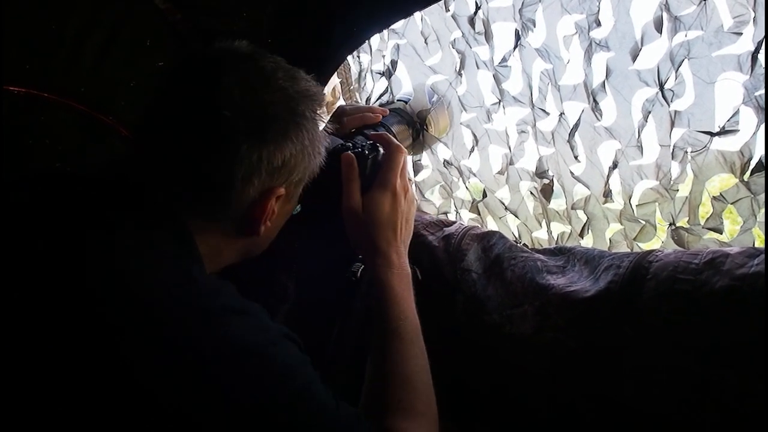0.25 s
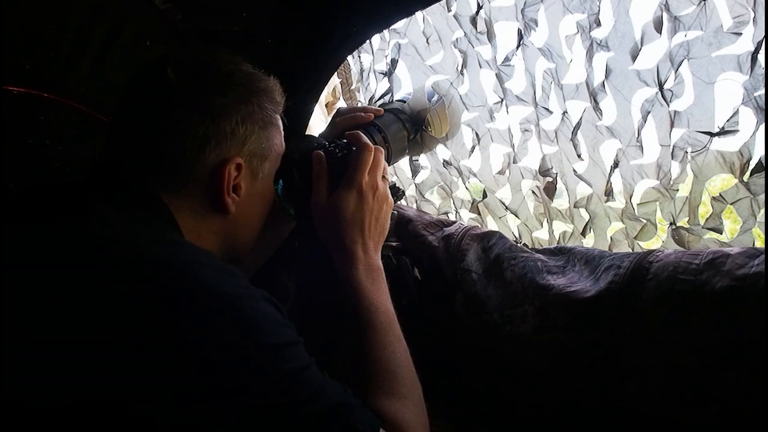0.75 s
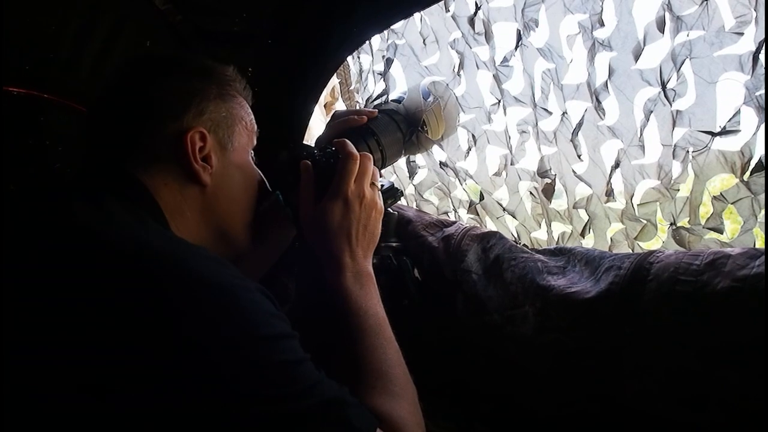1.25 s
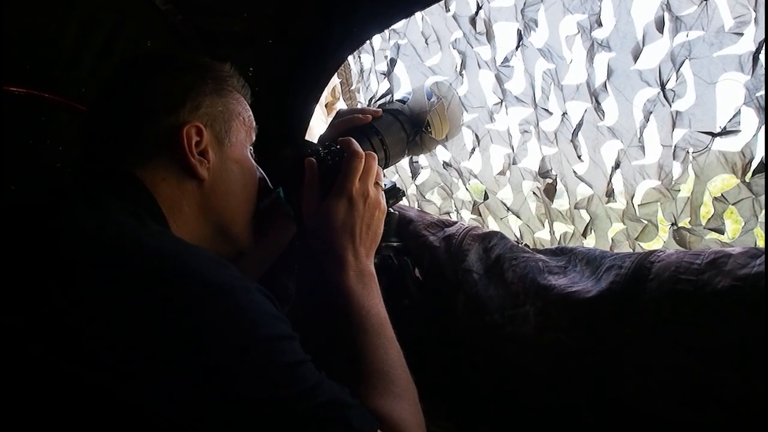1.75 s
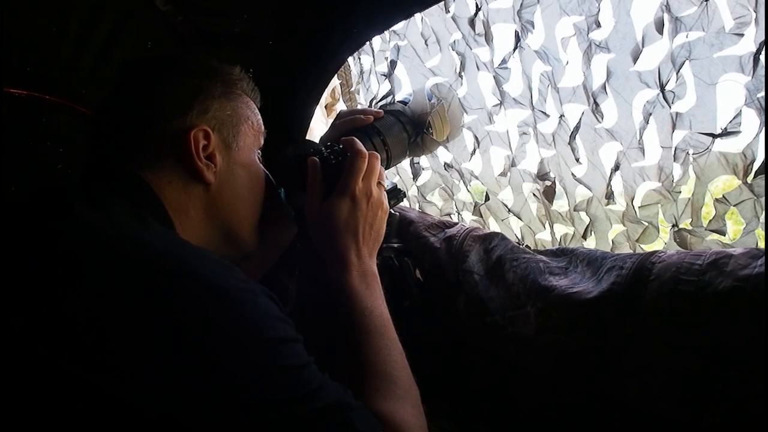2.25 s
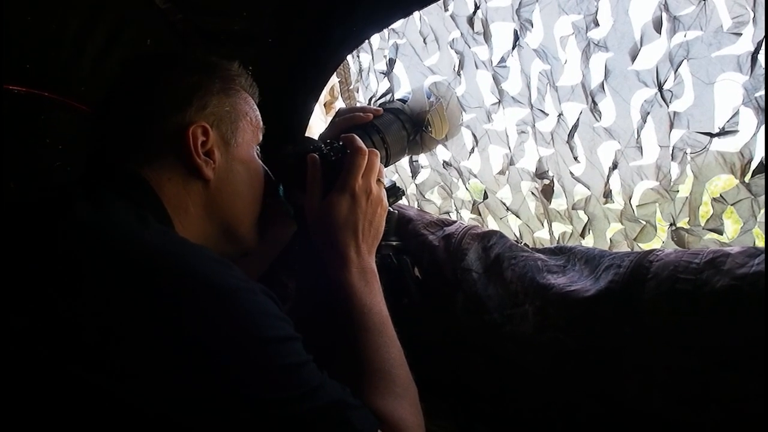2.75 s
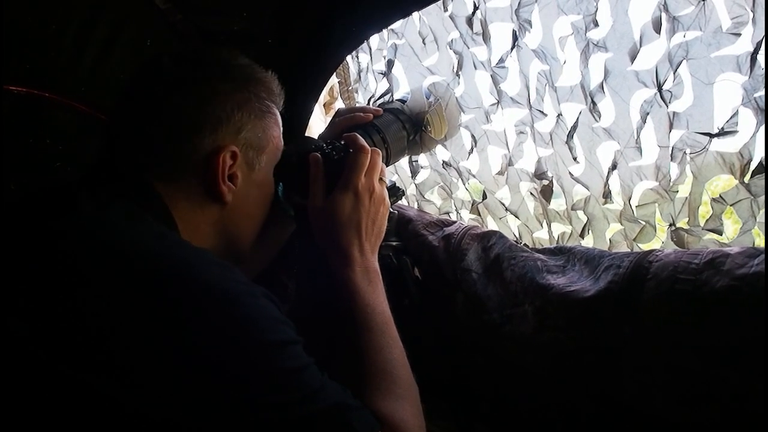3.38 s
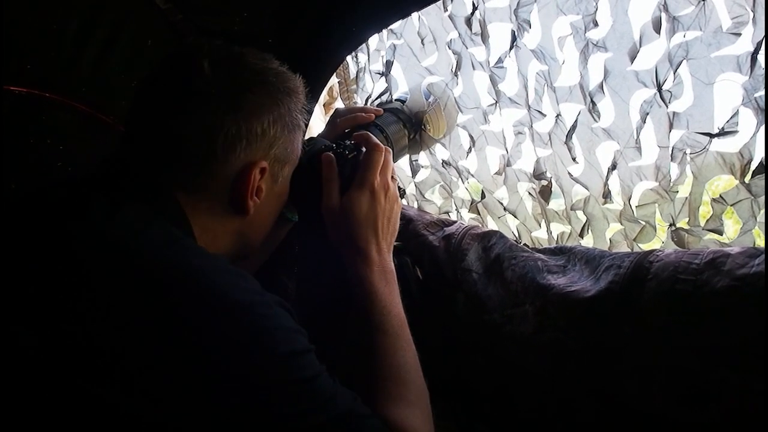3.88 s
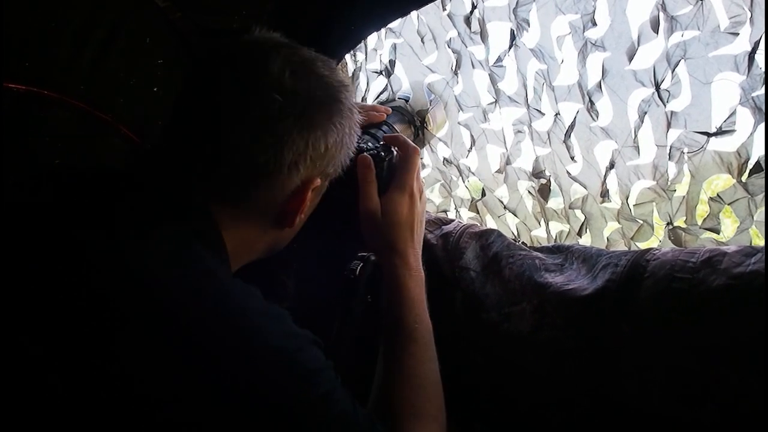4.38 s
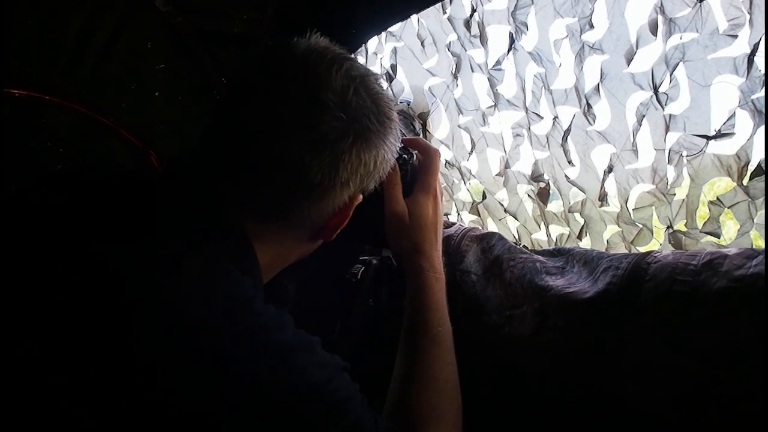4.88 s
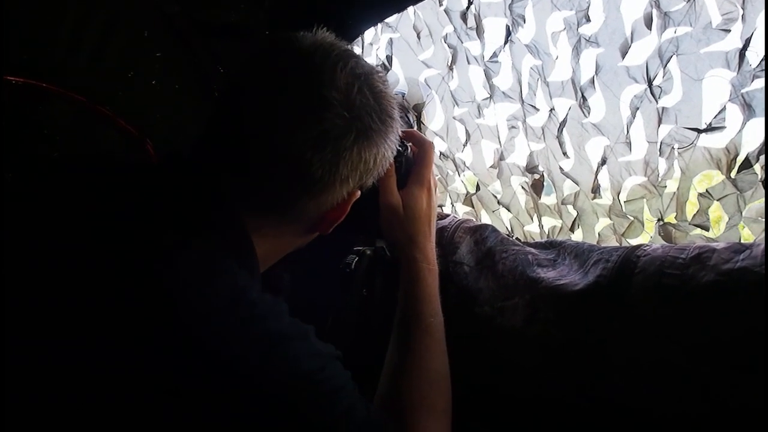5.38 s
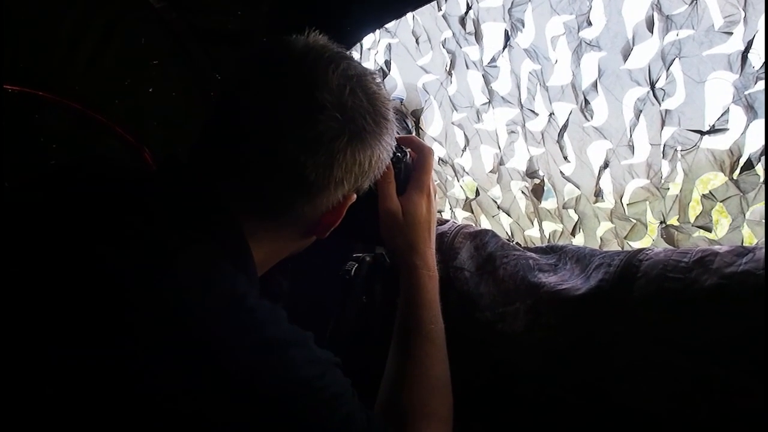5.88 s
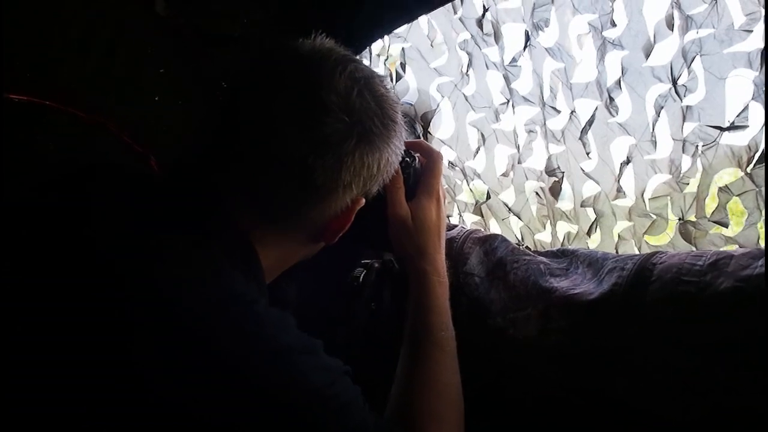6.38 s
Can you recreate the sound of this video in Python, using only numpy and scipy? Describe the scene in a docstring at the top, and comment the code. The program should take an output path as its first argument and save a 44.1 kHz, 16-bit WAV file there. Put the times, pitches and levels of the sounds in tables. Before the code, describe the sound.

Stereo, from inside a cloth hide at a bee-eater colony. From 0 to 0.4 s a tight burst of close, liquid, nearly pure notes around 1.5 to 1.9 kHz, some rolled, strongest near 0.2 s. Dry net ticks snap among them up to 0.5 s. Calls then turn faint and scattered over a soft, swelling far flock, steady air, low uneven rumble and a barely heard motor drone. From 0.5 s distant songbirds add buzzy, fluttering glides; between 1.2 and 4.8 s a thin, high triple-pulsed chirp repeats about four times a second. Cloth rubbing and plastic net rustle ease mid-way, with ticks around 4 and 4.8 s, then grow from 5 s, the net peaking near 5.35 s and cloth near 6.3 s. Close bird notes return from 5.96 s, and four soft low bumps fall from 6.43 s to the end, about 6.6 s.

```python
"""Bee-eaters around their nesting bank, heard from inside a cloth hide. We open on a burst of close liquid notes,
short arches of almost pure tone, over a far flock of the same notes, noise beds of air and rumble and a faint
drone; shaped noise makes cloth rub and a net rustle, crackle and tick. From half a second songbirds add fluttering
glides, and from 1.2 s to 4.8 s thin triple-pulsed chirps repeat evenly. Around 6 s near notes return, then
soft bumps follow: decaying sines with a puff of noise."""
import sys
import numpy as np
from scipy import signal
from scipy.fft import rfft, irfft, next_fast_len
from scipy.io import wavfile

SR = 44100
rng = np.random.default_rng(int(sys.argv[2]) if len(sys.argv) > 2 else 0)


def transcribe(signal):
    """Save signal, clipped to [-1, 1], as a 16-bit WAV file at the path in sys.argv[1]."""
    frames = np.atleast_2d(signal).T
    limited = np.clip(frames, -1, 1)
    pcm = np.round(limited * 32767).astype(np.int16)
    wavfile.write(sys.argv[1], SR, pcm)


N = 291986
TIME = np.arange(N) / SR

# bee-eater notes: [start t/s, length/s, top f/Hz, place of the top 0-1, full sweep as a share of top f,
#                   level/dB before space and panning, roll 0-1]
BEE_EATER_NOTES = [(-0.025, 0.097, 1611, 0.55, 0.041, -32, 0.54),
                   (0.014, 0.066, 1820, 0.08, 0.38, -37, 0.6), (0.103, 0.023, 1520, 0.4, .17, -38.5, 0.5),
                   (0.144, 0.089, 1728, 0.67, .17, -31, 0.72), (0.159, .015, 1720, 0.74, 0.28, -24, .35),
                   (0.179, 0.011, 1850, 0.69, .08, -20.5, .12), (0.19, .014, 1886, 0.2, 0.15, -14.5, 0),
                   (0.239, 0.033, 1884, .45, .06, -37, 0.87), (0.251, 0.063, 1460, 0.56, 0.13, -34.5, 0.6),
                   (0.284, 0.1, 1610, 0.41, 0.07, -29.5, 0.64), (0.293, 0.021, 1910, 0.36, .15, -28, 0),
                   (0.318, 0.076, 1920, .17, 0.4, -31.5, 0.26), (0.41, 0.062, 1232, 0.47, 0.17, -44, 0.54),
                   (.514, 0.029, 1770, .12, 0.21, -41.5, 0.5),
                   (0.559, 0.056, 1680, 0.34, 0.062, -46.5, 0.54),
                   (0.67, 0.057, 1658, 0.69, .07, -45, 0.24), (0.739, 0.083, 1602, 0.14, 0.07, -43, .02),
                   (.941, 0.025, 1757, .19, 0.18, -41, 0.1), (1.005, 0.035, 1673, 0.41, 0.15, -45, 0.45),
                   (1.088, 0.029, 1870, 0.4, 0.13, -46.5, 0.1), (1.131, 0.031, 1690, .36, 0.11, -45.5, 0.6),
                   (1.244, 0.053, 1735, 0.42, 0.078, -45, 0.6), (1.265, 0.039, 1463, .16, .16, -51, .4),
                   (1.494, 0.035, 1625, 0.3, 0.092, -45, .42), (1.561, 0.041, 2016, 0.24, 0.21, -37.5, 0.5),
                   (1.564, .016, 2283, 0.62, 0.14, -33, 0.2), (1.626, 0.026, 1744, .05, 0.16, -40, 0.5),
                   (1.936, 0.087, 1873, 0.62, .1, -43.5, 0.85), (2.007, .028, 1616, 0.2, 0.11, -43.5, 0.5),
                   (2.034, 0.064, 1986, .43, .13, -48, 0.9), (2.211, 0.028, 1763, 0.47, 0.073, -46, 0),
                   (2.276, 0.03, 1740, 0.47, 0.14, -50, .2), (2.363, 0.042, 1800, 0.37, 0.11, -47.5, .8),
                   (2.524, 0.046, 1895, 0.1, 0.24, -46, 0.7), (2.574, 0.035, 1588, .4, 0.068, -44, 0.44),
                   (2.788, 0.11, 1870, 0.47, .15, -46, 0.8), (2.909, 0.043, 1520, 0.37, 0.2, -48, 0.3),
                   (3.26, 0.061, 1757, 0.64, 0.16, -48.5, 0.65),
                   (3.385, 0.083, 1605, 0.72, .13, -46.5, .38), (3.91, .09, 2100, .5, .2, -48.5, .8),
                   (4.033, 0.055, 1744, .55, .2, -50, 1), (4.164, 0.084, 1504, 0.6, .17, -50, 0.7),
                   (4.581, 0.059, 1710, 0.3, 0.15, -46, 1), (4.722, 0.097, 1827, 0.2, .17, -46, 0.64),
                   (4.995, 0.02, 1745, 0.2, 0.16, -44, 0.2), (5.129, 0.04, 1865, .5, .12, -44, 0.5),
                   (5.259, 0.089, 1706, 0.13, 0.11, -46, 0.9), (5.53, 0.028, 1820, 0.6, .05, -49.5, 0.2),
                   (5.839, .033, 1870, 0.5, 0.19, -45, 0.43), (5.961, 0.061, 1660, 0.28, 0.17, -30.5, 0.18),
                   (6.034, 0.039, 1700, 0.43, 0.16, -31.5, 0.22),
                   (6.061, 0.053, 1438, 0.6, 0.11, -39, 0.25), (6.116, 0.044, 1810, 0.46, 0.3, -30, .3),
                   (6.282, .033, 1573, 0.33, 0.2, -46.5, 0), (6.427, 0.03, 1893, 1, 0.1, -30, 0.38),
                   (6.457, 0.018, 1830, 0.24, 0.19, -26.5, 0.26),
                   (6.546, 0.046, 1860, 0.48, 0.2, -44.5, 0.35)]
# notes that mostly rise are harsher: [place of the top 0-1, overtone level/dB before mixing]
OVERTONE_HARSHNESS = [(.45, -39), (.65, -19.5), (.82, -8)]
# early echoes from ground and hide: [left delay/s, right delay/s, relative level/dB]
EARLY_ECHOES = [(.0046, 0.0091, -17), (0.0099, 0.0083, -10), (.019, 0.03, -18.5)]
# swell of the distant flock: [t/s, level/dB before trim]
FLOCK_SWELL = [(0, -57), (.35, -57), (1.15, -55), (1.5, -48), (1.75, -53), (2.8, -48.5), (3.7, -74),
               (4.05, -55.5), (4.37, -72), (5.29, -51), (5.6, -64), (6.62, -58)]
# colour of the steady air: [f/Hz, relative level/dB per Hz]
AIR_COLOUR = [(20, -17), (45, -10), (190, -3.5), (300, -6.5), (420, -13), (550, -7), (1200, -14),
              (1650, -3), (2150, -13), (3160, -14), (4370, -15), (6380, -9), (7710, -14), (15000, -17.5)]
# colour of the far rumble: [f/Hz, relative level/dB per Hz]
RUMBLE_COLOUR = [(30, -31), (58, -10), (88, 2), (130, -9), (190, -8), (235, -24), (300, -12), (380, -24),
                 (1000, -38)]
# the far rumble swells and sinks: [t/s, level/dB before trim]
RUMBLE_SWELL = [(0.0, -65), (0.41, -60), (0.72, -69), (0.75, -58), (1.64, -66), (2.3, -57), (2.95, -59.5),
                (2.99, -67), (3.45, -58.5), (3.47, -67), (4.39, -58.5), (4.94, -68), (6.32, -71),
                (6.62, -62)]
# faint far motor drone: [t/s, f/Hz before waver, level/dB before waver]
MOTOR_DRONE = [(0, 195, -70.5), (1.1, 195, -75), (1.5, 192, -65), (2.1, 192, -65), (2.7, 185, -87),
               (4.5, 165, -74), (5.1, 162, -63.5), (5.6, 160, -82)]
# the person in the hide shifts, holds still, then shifts again:
# [t/s, cloth rubbing level/dB before trim, net rustle level/dB before trim]
PERSON_STIRRING = [(0, -64.5, -55.5), (.1, -56.5, -51), (.28, -58, -55), (.5, -57, -56), (.6, -63, -54.5),
                   (.92, -60, -51), (1.28, -61, -59), (2.1, -59.5, -62), (3.8, -61.5, -59.5),
                   (3.95, -60.5, -54.5), (4.33, -60.5, -56), (5.05, -54.5, -51.5), (5.35, -53.5, -47),
                   (5.62, -57, -55.5), (6.27, -50, -52.5), (6.62, -54, -59.5)]
# colour of the rubbing cloth: [f/Hz, relative level/dB per Hz]
CLOTH_COLOUR = [(150, -38), (380, -10), (550, 2), (1100, 3.5), (2000, 0), (3100, 3.5), (4500, -5.5),
                (9000, -14.5), (16000, -42)]
# colour of the rustling net: [f/Hz, relative level/dB per Hz]
NET_COLOUR = [(500, -13), (2000, -2.5), (3200, 3.5), (5000, -0.5), (8000, -3.5), (10500, -1), (13500, -2.5),
              (16000, -12)]
# stereo width of the noise beds: [f/Hz, left-right likeness 0-1]
STEREO_LIKENESS = [(60, 0.97), (150, 0.87), (380, 0.83), (950, 0.54), (2380, 0.48), (5980, 0.022),
                   (15000, 0.23)]
# balance of the noise beds: [f/Hz, left minus right level/dB]
STEREO_LEAN = [(50, 3.5), (500, 4.5), (1700, 2), (4000, 2), (8000, 3), (14000, 4.5)]
# dry ticks of the net: [t/s, level/dB before filtering]
NET_TICKS = [(0.0618, -28), (0.0885, -17.5), (0.1411, -29), (0.3955, -33), (0.4888, -25.5), (3.8631, -33),
             (3.911, -30), (4.0961, -34), (4.8234, -30)]
# buzzy notes of far songbirds: [start t/s, length/s, first f/Hz, last f/Hz, level/dB before mixing]
SONGBIRD_NOTES = [(0.544, .13, 2370, 2430, -52.5), (.56, 0.071, 3100, 3230, -59),
                  (1.177, 0.042, 2790, 2230, -51.5), (1.545, .1, 4600, 4250, -62),
                  (1.649, 0.11, 3810, 3840, -55.5), (1.812, 0.13, 3250, 3220, -52),
                  (2.056, .16, 4130, 4230, -57), (2.4, 0.031, 3150, 2920, -57.5),
                  (2.572, 0.059, 2980, 3180, -57), (2.975, 0.042, 2630, 2850, -56),
                  (4.307, 0.044, 2590, 2480, -56), (5.576, .04, 4440, 4300, -57),
                  (5.725, 0.11, 4880, 4800, -57), (5.961, 0.085, 3320, 3210, -53)]
# swell of the thin, evenly repeated chirp: [t/s, level/dB before mixing]
CHIRP_SWELL = [(1.2, -68), (2.25, -63.5), (2.8, -75), (3.6, -58), (4.2, -69)]
# soft bumps inside the hide: [t/s, level/dB before trim]
HIDE_BUMPS = [(6.43, -39.5), (6.487, -48), (6.523, -50), (6.555, -45)]


def from_db(db):
    """Decibels to gain."""
    return 10 ** (np.asarray(db) / 20)


def rms_one(x):
    """Scale to unit power."""
    return x / np.sqrt(np.mean(x ** 2) + 1e-20)


def in_time(rows):
    """Each column of a curve at every sample."""
    t, *columns = np.transpose(rows)
    return [np.interp(TIME, t, column) for column in columns]


def at_hz(points, hz):
    """Read a spectrum on a log-frequency axis."""
    point_hz, values = np.transpose(points)
    return np.interp(np.log(hz), np.log(point_hz), values)


def band(x, low_hz, high_hz):
    """Gentle band-pass."""
    edges = [low_hz, min(high_hz, .45 * SR)]
    sos = signal.butter(2, edges, "band", fs=SR, output="sos")
    return signal.sosfilt(sos, x + 1e-18)


def drift(rate, size=N):
    """Smooth chance with spread 1 that changes about rate times a second."""
    place = np.arange(size) / SR * rate + rng.random()
    knots = int(place[-1]) + 2
    # straight lines between random points lose a third of their power; restore it
    return np.interp(place, np.arange(knots), rng.standard_normal(knots)) * np.sqrt(3 / 2)


def pan(left_db):
    """Gains of the two channels, left louder than right by left_db."""
    return from_db(np.array([[.5], [-.5]]) * left_db)


def add(out, start, sound):
    """Mix a sound in at a time."""
    i = int(round(start * SR))
    a, b = max(i, 0), min(i + len(sound), N)
    if b > a:
        out[a:b] += sound[a - i:b - i]


def delayed(x, lag):
    """The same sound, lag seconds later."""
    return np.interp(TIME - lag, TIME, x, left=0)


def scatter(x, t60):
    """A wash of decaying noise, as bank and bushes return it, partly different on each side."""
    t = np.arange(SR // 2) / SR
    noise = rng.standard_normal((3, len(t)))
    onset = 1 - np.exp(-t / 0.0042)
    # one shared noise keeps the sides partly alike
    tail = (noise[:2] + noise[2]) * from_db(-60 * t / t60) * onset
    tail /= np.sqrt(np.sum(tail ** 2, axis=1, keepdims=True))
    return signal.fftconvolve(x[None], tail, axes=1)[:, :N]


def coloured(spectrum):
    """Stereo noise of a given colour, most alike on both sides in the bass; rms 1."""
    size = next_fast_len(N)
    hz = np.maximum(np.fft.rfftfreq(size, 1 / SR), 1)
    mid, side = rfft(rng.standard_normal((2, size)))
    alike = np.clip(at_hz(STEREO_LIKENESS, hz), 0, 1)
    both = np.sqrt(1 + alike) * mid + np.sqrt(1 - alike) * side * [[1], [-1]]
    shaped = both * from_db(at_hz(spectrum, hz)) * pan(at_hz(STEREO_LEAN, hz))
    return rms_one(irfft(shaped)[:, :N])


def bursts(rows, decay):
    """Short puffs of stereo noise that die away."""
    fade = np.exp(-np.arange(SR // 10) / SR / decay)
    envelope = np.zeros(N)
    for start, level_db in rows:
        add(envelope, start, from_db(level_db) * fade)
    return envelope * rng.standard_normal((2, N))


def note(length, top_hz, top_place, sweep, level_db, roll, overtone_db):
    """One arch of pitch as (fundamental, overtones); a rolled note trills and shakes in pitch and strength."""
    sweep_s = 0.0133  # a side of the arch shorter than this covers only part of the sweep
    roll_hz, roll_depth = 325.2, 0.13  # a full roll swings the pitch about this fast, by this share
    trill_hz, trill_depth = 31, 0.22
    u = np.linspace(0, 1, max(int(length * SR), 8))
    top = np.clip(top_place, .05, .95)

    rise, fall = sweep * np.minimum(np.array([top, 1 - top]) * length / sweep_s, 1)
    below_top = np.where(u < top, rise * (1 - u / top) ** 2, fall * ((u - top) / (1 - top)) ** 2)
    uneven_roll_hz = roll_hz * (1 + 0.094 * drift(119.4, len(u)))
    swing = roll_depth * roll ** 2 * np.sin(2 * np.pi * np.cumsum(uneven_roll_hz) / SR)
    hz = top_hz * (1 - below_top + swing)
    waver = 1 + 0.04 * roll * drift(655.4, len(u))
    phase = 2 * np.pi * np.cumsum(hz * waver) / SR

    throb = 1 + trill_depth * roll ** 2 * np.cos(2 * np.pi * trill_hz * (u - .5) * length)
    grain = from_db(4.5 * roll * drift(380, len(u)))
    # the loudest moment leans from the middle towards the top of the pitch
    loudest = .5 + 0.24 * (top - .5)
    arch = np.abs(np.sin(np.pi * np.interp(u, [0, loudest, 1], [0, .5, 1]))) ** 0.42
    swell = arch * rms_one(throb * grain)

    # the third harmonic only comes out in the most forceful notes
    third = from_db(level_db + 9)
    overtones = from_db(overtone_db) * (np.sin(2 * phase) + third * np.sin(3 * phase))
    return np.sqrt(2) * from_db(level_db) * swell * np.array([np.sin(phase), overtones])


def add_arch(out, start, sound):
    """Mix a note's fundamental and its overtones into their own tracks."""
    for track, part in zip(out, sound):
        add(track, start, part)


def bee_eaters(near_db=-40):
    """Loud notes are close and dry, faint ones are far and washed."""
    near, far = np.zeros((2, 2, N))
    for start, length, top_hz, top_place, sweep, level_db, roll in BEE_EATER_NOTES:
        overtone_db = np.interp(top_place, *np.transpose(OVERTONE_HARSHNESS))
        sound = note(length, top_hz, top_place, sweep, level_db, roll, overtone_db)
        add_arch(near if level_db > near_db else far, start, sound)

    fundamental, overtones = near + from_db(-.5) * far
    direct = fundamental + from_db(-7) * overtones
    out = np.array([direct, delayed(direct, .000025)])
    for left, right, gain_db in EARLY_ECHOES:
        out = out + from_db(gain_db) * np.array([delayed(direct, left), delayed(direct, right)])

    wash = scatter(from_db(-20) * near[0] + from_db(-10) * far[0], t60=0.2)
    # the short waves of the overtones are broken up by the net and the hide's walls
    netted = from_db(-1) * scatter(overtones, t60=0.03)
    return (from_db(-0.5) * out + wash + netted) * pan(1.4)


def flock(count=150, pitch_hz=1780, spread=0.091):
    """Many more birds give the same soft rolled note from far across the colony."""
    out = np.zeros(N)
    starts = (np.arange(count) + rng.random(count)) / count * N / SR
    for start, (pitch, length, loud) in zip(starts, rng.standard_normal((count, 3))):
        call = note(0.045 * np.exp(0.197 * length), pitch_hz * np.exp(spread * pitch), top_place=0.505,
                    sweep=0.166, level_db=-45 + 2 * loud, roll=0.42, overtone_db=-19)
        add(out, start, call.sum(axis=0))
    washed = rms_one(0.94 * out + scatter(out, t60=0.24))
    return from_db(in_time(FLOCK_SWELL)[0] - 2.5) * washed * pan(1.6)


def outdoors():
    """Steady noise for air, swelling low noise for far rumble, and a wavering sine for the drone."""
    air = from_db(-51) * coloured(AIR_COLOUR)
    rumble = from_db(in_time(RUMBLE_SWELL)[0] - 1.5) * coloured(RUMBLE_COLOUR)
    hz, drone_db = in_time(MOTOR_DRONE)
    drone_gain = np.sqrt(2) * from_db(drone_db + 2.5 * drift(22.14))
    drone_phase = 2 * np.pi * np.cumsum(hz * (1 + 0.0388 * drift(35))) / SR
    return air + rumble + drone_gain * np.sin(drone_phase) * pan(4)


def crackle(per_s=110, spread_db=4):
    """Plastic leaves flick against each other at random: tiny snaps, a few much stronger than the rest."""
    born = rng.random(N) < per_s / SR
    sizes = born * from_db(spread_db * np.minimum(rng.exponential(1, N), 3))
    # each snap dies away with a 1 ms time constant
    envelope = signal.lfilter([1], [1, -np.exp(-1 / (0.001 * SR))], sizes + 1e-18)
    return rms_one(band(envelope * rng.standard_normal((2, N)), 2300, 19000)) * pan(3.3)


def cloth_and_net():
    """Cloth rubs as uneven noise; the net's plastic leaves rustle in brighter noise and crackle."""
    cloth_db, net_db = in_time(PERSON_STIRRING)
    cloth = rms_one(coloured(CLOTH_COLOUR) * from_db(2 * drift(120)))
    rustle = rms_one(coloured(NET_COLOUR) * from_db(drift(500) + 1.9 * drift(45)))
    net = rustle + from_db(-7) * crackle()
    return from_db(cloth_db + 3) * cloth + from_db(net_db + 0.66) * net


def net_ticks():
    """Dry noise snaps of the net, after which the leaves slide on with a thin hiss."""
    snaps = bursts(NET_TICKS, decay=0.0025)
    slides = from_db(-17) * bursts(NET_TICKS, decay=.05)
    ticks = band(snaps + slides, 9600, 13800) + from_db(-11) * band(snaps, 2500, 8000)
    return from_db(-5.5) * ticks * pan(8.5)


def buzzy(length, first_hz, last_hz, level_db, buzz, grain_db):
    """A gliding note whose pitch and strength flutter fast."""
    u = np.linspace(0, 1, int(length * SR))
    flutter = drift(709, len(u)) + 0.454 * drift(92, len(u))
    hz = (first_hz + (last_hz - first_hz) * u) * (1 + buzz * flutter)
    grain = rms_one(from_db(grain_db * drift(178, len(u))))
    swell = np.sqrt(2 * np.abs(np.sin(np.pi * u))) * grain
    return from_db(level_db) * swell * np.sin(2 * np.pi * np.cumsum(hz) / SR)


def songbirds():
    """Small songbirds buzz from the bushes in gliding, fluttering tones."""
    song = np.zeros(N)
    for start, *glide in SONGBIRD_NOTES:
        add(song, start, buzzy(*glide, buzz=0.0428, grain_db=1.5))
    return (from_db(-4) * song + scatter(song, t60=0.1)) * pan(3.5)


def thin_chirps(chirp_hz=5020, every_s=.2515, pulse_gap_s=0.034, pulse_s=0.017):
    """Each chirp is three even pulses of a high, slightly fluttering tone."""
    chirps = np.zeros(N)
    for start in np.arange(1.205, 4.8, every_s):
        level_db = np.interp(start, *np.transpose(CHIRP_SWELL))
        for k in range(3):
            pulse = buzzy(pulse_s, chirp_hz, chirp_hz, level_db, buzz=0.0081, grain_db=8)
            add(chirps, start + k * pulse_gap_s, pulse)
    return (from_db(2) * chirps + scatter(from_db(6) * chirps, t60=0.1)) * pan(3.5)


def thumps(body_hz=215, decay=0.0064):
    """A soft bump sets the hide's floor ringing for a couple of cycles, with a puff of noise."""
    out, t = np.zeros(N), np.arange(SR // 10) / SR
    ring = np.sin(2 * np.pi * body_hz * t) * np.exp(-t / decay)
    for start, level_db in HIDE_BUMPS:
        add(out, start, from_db(level_db + 1) * ring)
    puff = band(bursts(HIDE_BUMPS, decay).mean(axis=0), 440, 1100)
    return (out + from_db(13.5) * puff) * pan(8.5)


def scene():
    """Birds outside, the hide around the microphone."""
    birds = bee_eaters() + flock() + songbirds() + thin_chirps()
    hide = cloth_and_net() + net_ticks() + thumps()
    return birds + hide + outdoors()


def record(dry):
    """A steep elliptic low-pass cuts the top at 15.9 kHz."""
    return signal.sosfilt(signal.ellip(12, .1, 80, 15900, fs=SR, output="sos"), dry)


dry = scene()
out = record(dry)
transcribe(out)
```